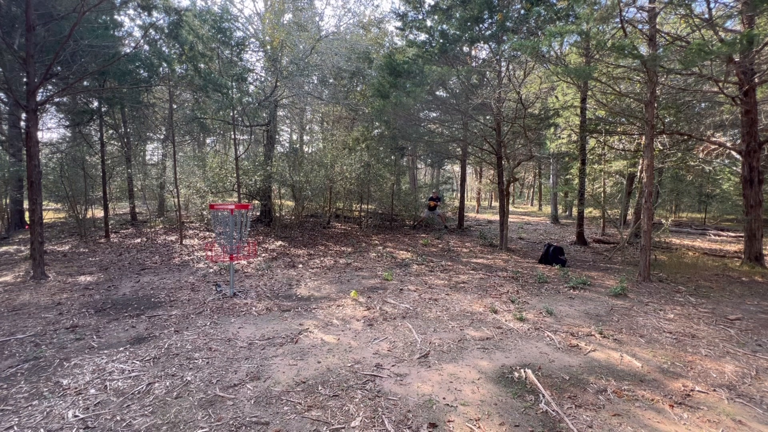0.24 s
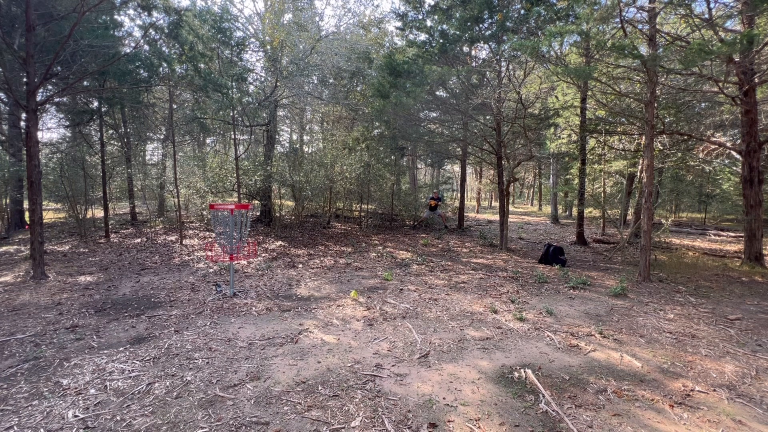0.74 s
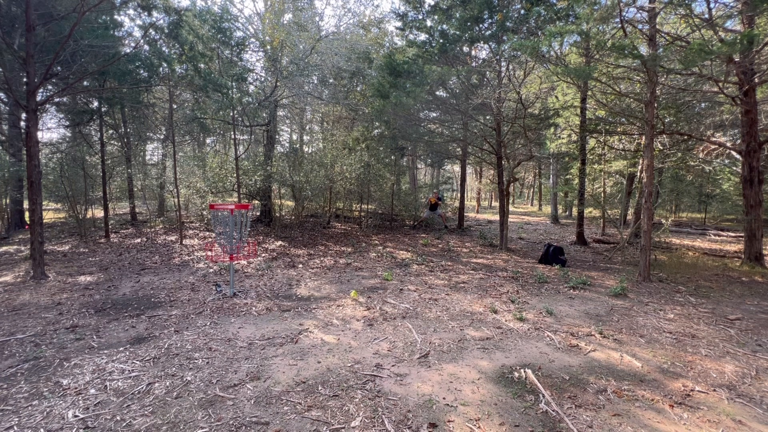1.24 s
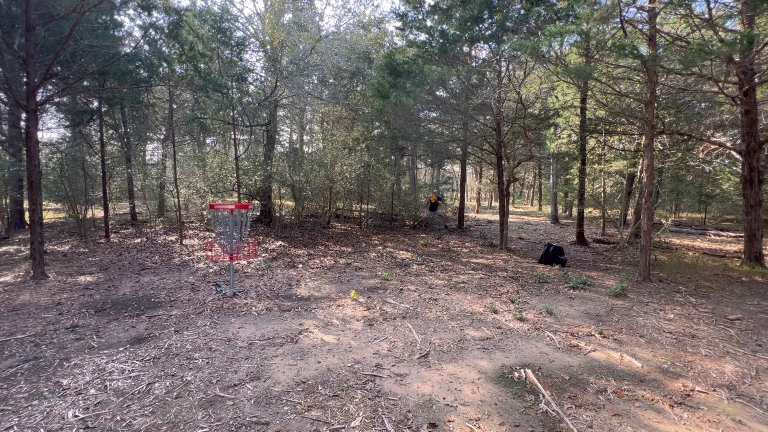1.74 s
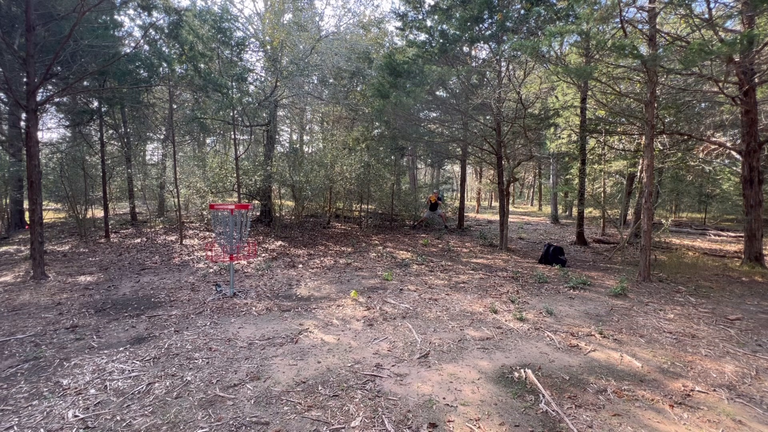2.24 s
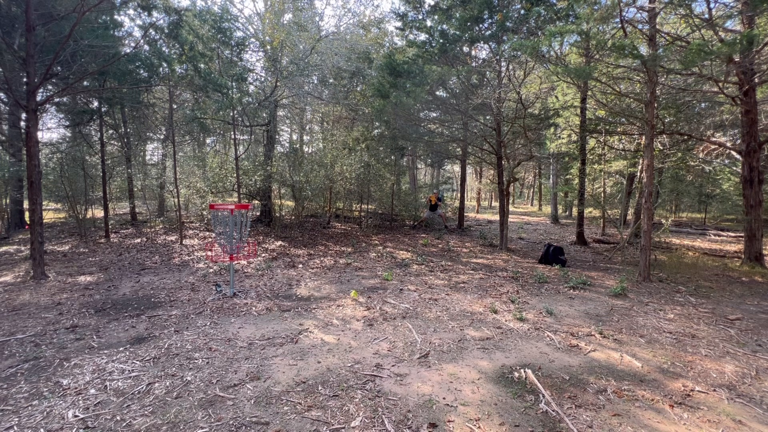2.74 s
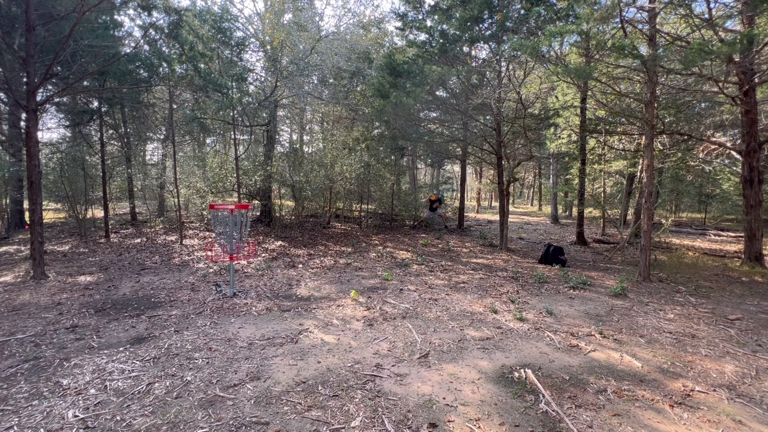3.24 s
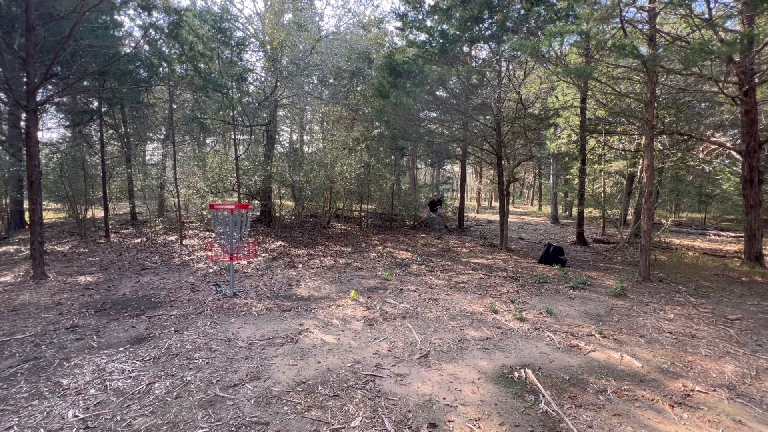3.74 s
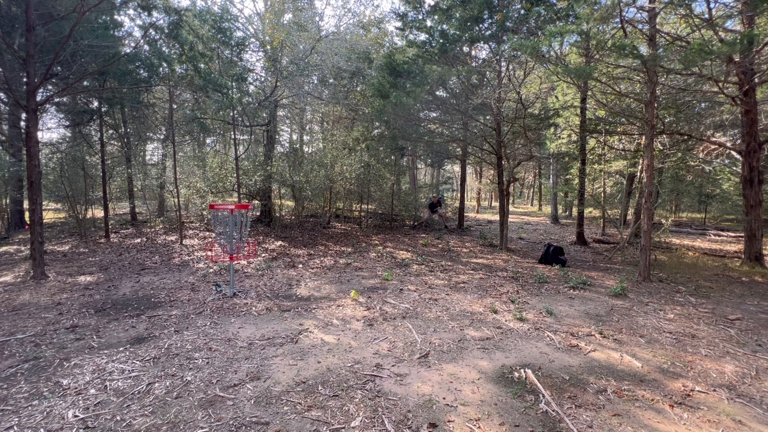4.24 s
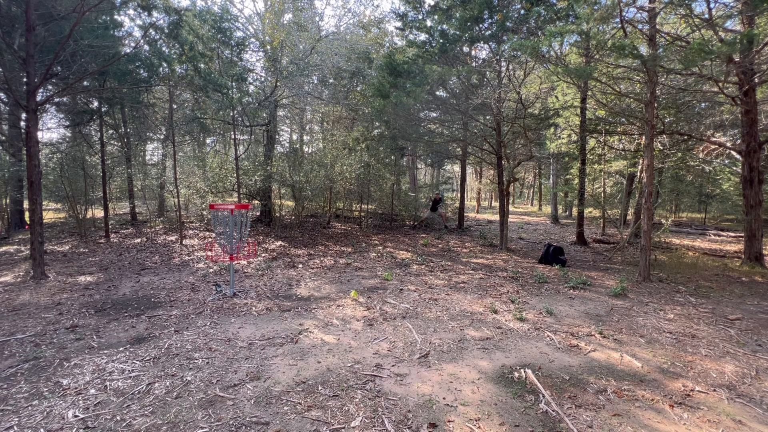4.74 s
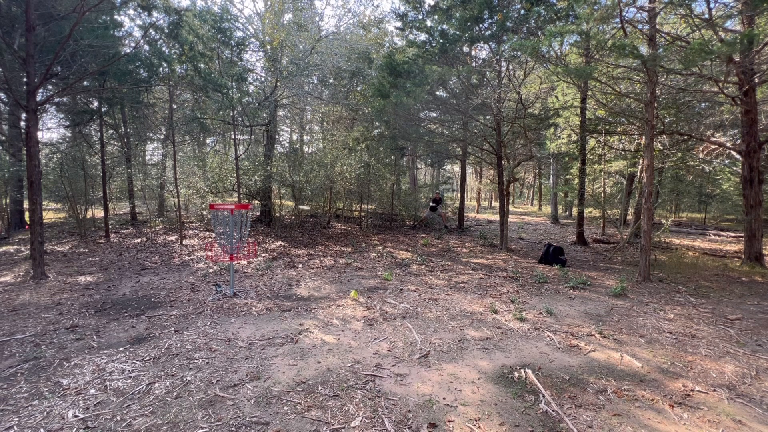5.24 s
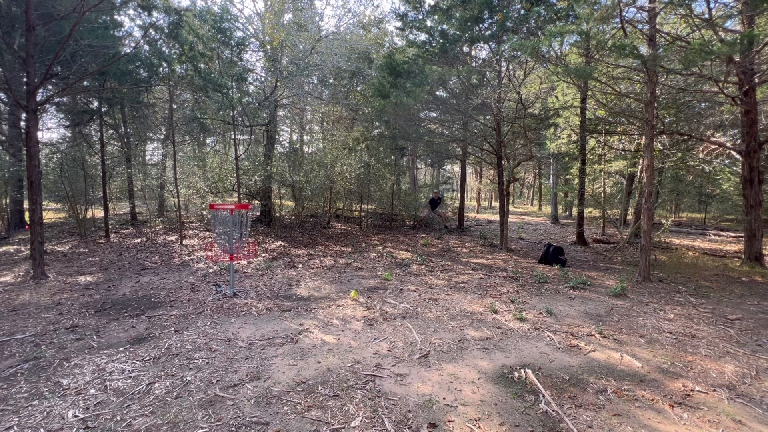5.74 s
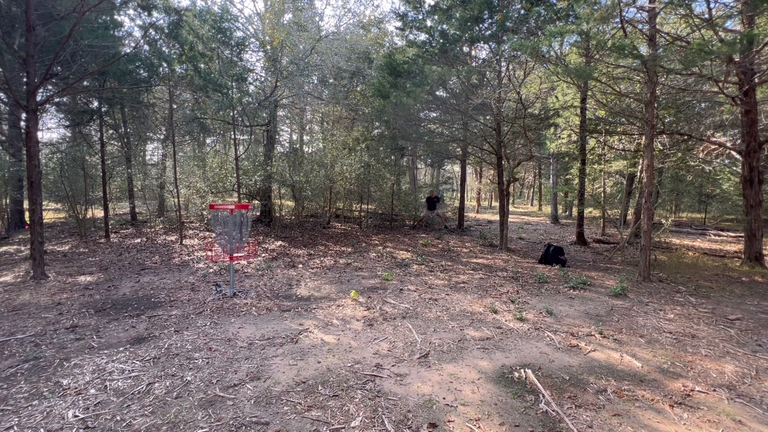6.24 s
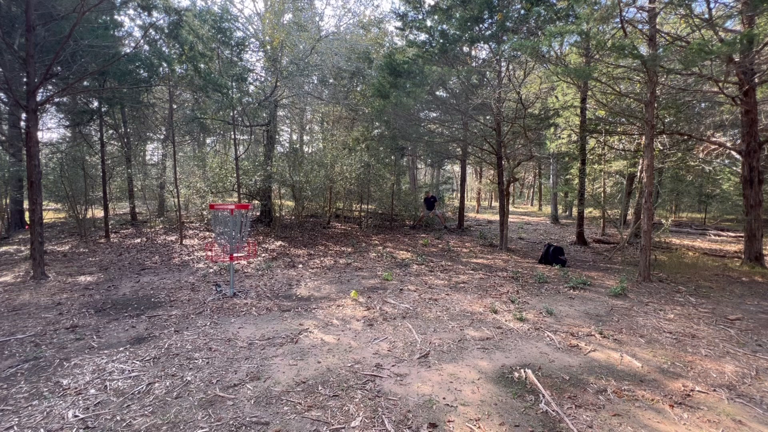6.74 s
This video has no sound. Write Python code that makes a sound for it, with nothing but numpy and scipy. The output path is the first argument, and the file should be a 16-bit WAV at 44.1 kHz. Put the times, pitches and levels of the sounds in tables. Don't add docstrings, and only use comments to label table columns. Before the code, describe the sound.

Faint birdsong and a low traffic wash, broken near the end by a bright, clashing metal chain crash that rattles and clinks out.

```python
import sys
import numpy as np
from scipy import signal
from scipy.fft import rfft, irfft, next_fast_len
from scipy.io import wavfile
from scipy.ndimage import uniform_filter1d, minimum_filter1d, map_coordinates

SR = 44100
rng = np.random.default_rng(int(sys.argv[2]) if len(sys.argv) > 2 else 0)


def master(y):
    cut = np.clip(np.atleast_2d(y).T, -1, 1)
    pcm = np.round(cut * 32767)
    wavfile.write(sys.argv[1], SR, pcm.astype(np.int16))


def amplitude_ratio(level_db):
    exponent = np.asarray(level_db, float) / 20
    return 10 ** exponent


N = 308086


def unit(x):
    return x / np.sqrt(np.mean(x ** 2) + 1e-20)


def along(points, hz):
    f, v = np.transpose(points)
    return np.interp(np.log(hz + 1), np.log(f + 1), v)


def filtered(x, response):
    m = next_fast_len(x.shape[-1] + SR // 2)
    spectrum = rfft(x, m) * response(np.fft.rfftfreq(m, 1 / SR))
    return irfft(spectrum, m)[..., :x.shape[-1]]


def noise(spectrum, channels=1, patchy_db=1):
    z = signal.stft(rng.standard_normal((channels, N)), nperseg=512)[2]
    field = uniform_filter1d(rng.standard_normal(z.shape[1:]), size=6, axis=0)
    field = uniform_filter1d(field, size=12, axis=1)
    flat = signal.istft(z * amplitude_ratio(patchy_db * unit(field)), nperseg=512)[1][:, :N]
    return unit(filtered(flat, lambda hz: amplitude_ratio(along(spectrum, hz))))


def ports(x, lead, lean):
    half = lambda hz: amplitude_ratio(along(lean, hz) / 2) * np.exp(.5j * along(lead, hz))
    return filtered(np.array([x, x]), lambda hz: np.array([half(hz), 1 / half(hz)]))


def puffs(taps, spectrum, t60):
    t = np.arange(SR // 10) / SR
    burst = rng.standard_normal((len(taps), len(t))) * amplitude_ratio(-60 * t / t60)
    puff = filtered(burst, lambda hz: amplitude_ratio(along(spectrum, hz)))
    puff = puff / np.linalg.norm(puff)
    return signal.fftconvolve(taps, puff, axes=1)[:, :taps.shape[1]].sum(axis=0)


# f/Hz, level/dB per Hz
DRONE = [(12, -71), (20, -31.5), (30, -18), (50, -1.5), (70, 2.5), (90, -3), (100, -9.5), (114, -10.5),
         (146, -20), (260, -43), (340, -60), (570, -120)]


def traffic_drone():
    low = noise(DRONE, channels=2, patchy_db=0.0)
    from_right = ports(low[0], [(30, -.15), (200, -.4)], [(60, -1.6)])
    return amplitude_ratio(-50) * (from_right + .1 * low[1] * [[1], [-1]])


# f/Hz, level/dB per Hz
TRAFFIC = [(100, 5), (200, 1), (320, -2), (620, 0.5), (850, -4), (1200, -15), (2000, -22.5), (4000, -33),
           (9000, -36), (11000, -36.5), (13500, -37.5), (14500, -41)]
# f/Hz, likeness [0 to 1]
TRAFFIC_ALIKE = [(100, 0.27), (300, 0.8), (600, 0.67), (1000, 0.18), (9500, 0.064), (11500, 0.63),
                 (13000, 0.76)]
# f/Hz, phase [radians]
TRAFFIC_LEAD = [(50, 0.46), (260, 1.04), (600, 2.12), (900, 4.5), (11000, 3.5), (12700, 1.5)]


def traffic_wash():
    same, *apart = noise([(40, -42)] + TRAFFIC + [(15500, -74)], channels=3, patchy_db=1.2)
    alike = lambda hz: np.clip(along(TRAFFIC_ALIKE, hz), 0, 1)
    shared = ports(same, TRAFFIC_LEAD, [(500, 0.043)])
    wash = filtered(shared, lambda hz: np.sqrt(alike(hz)))
    wash += filtered(np.array(apart), lambda hz: np.sqrt(1 - alike(hz)))
    return amplitude_ratio(-67) * wash


# f/Hz, level/dB per Hz (the sound also thins in narrow bands near 5.3 and 7.7
# kHz)
PORT_HISS = [(900, -4), (1500, 1), (1750, 8.5), (2100, -4.5), (4500, -7.5), (5100, -4.5), (5350, -13),
             (5700, -7), (7100, -1), (7700, -14.5), (8300, -3.5), (9500, -11), (10600, -28)]


def port_hiss():
    hiss = noise([(500, -50)] + PORT_HISS + [(12000, -51)], patchy_db=-1.0)
    return amplitude_ratio(-79.0) * hiss * [[1], [0]]


# t/s, half length/s, leaves level/dB, swish level/dB
STIRS = [
    (.45, .15, -94, -104),
    (.84, .08, -99, -106),
    (2.27, .04, -101, -98),
    (3.797, .02, -101, -90),
    (4.04, .04, -85, -100),
    (4.37, .12, -94, -104),
    (4.636, 0.24, -85, -95),
    (4.91, .1, -91, -102),
    (5.2, 0.053, -86, -89),
    (5.308, 0.074, -90, -79),
]


def leaves():
    t, half, *levels = np.transpose(STIRS)[:, :, None]
    swell_db = -15 * np.abs(np.arange(N) / SR - t) / half
    breeze_db = -104
    rub, swish = [np.sqrt(amplitude_ratio(2 * breeze_db) + np.sum(amplitude_ratio(2 * (db + swell_db)), axis=0)) for db in levels]
    rustle = amplitude_ratio(0.5) * rub * noise([(10800, -42), (11800, -5), (13500, -5), (15200, -37)], patchy_db=2)[0]
    rustle += amplitude_ratio(3.5) * swish * noise([(5000, -20), (7500, -11), (10000, -8), (10800, -23)], patchy_db=5)[0]
    rush = amplitude_ratio(13 + levels[0] + swell_db)[np.argmax(half)]
    rustle += rush * noise([(300, -33), (600, 8.5), (2000, -7), (6000, -34), (9000, -50)])[0]
    return rustle


# t/s, level/dB
TWIGS = [
    (.82, -90),
    (5.269, -74),
]


def twigs():
    ticks = np.zeros(N)
    for t, db in TWIGS:
        ticks[round(t * SR)] = amplitude_ratio(db + 25)
    colour = [(3500, -30), (6000, 12), (13500, 3.0), (15000, -30)]
    return filtered(ticks, lambda hz: amplitude_ratio(along(colour, hz)))


# f/Hz, time to fall 60 dB/s
TRUNKS = [(300, 0.52), (3000, 0.54), (9000, 0.54), (16000, 0.046)]


def trunks(x):
    hz, t, z = signal.stft(rng.standard_normal((2, SR // 2)), SR, nperseg=256)
    fade = amplitude_ratio(-60 * t / along(TRUNKS, hz)[:, None])
    tail = signal.istft(z * fade, SR, nperseg=256)[1]
    tail = tail / np.linalg.norm(tail[0])
    late = np.pad(x, (300, 0))[None]
    return signal.fftconvolve(late, tail, axes=1)[:, :len(x)]


def whistle(rows):
    s, hz, db = np.transpose(rows)
    t = np.arange(s[0], s[-1], 1 / SR)
    edges = np.clip(np.minimum(t - s[0], s[-1] - t) / .003, 0, 1)
    phase = 2 * np.pi * np.cumsum(np.interp(t, s, hz)) / SR
    wave = edges * amplitude_ratio(np.interp(t, s, db)) * np.sin(phase)
    return np.pad(wave, (round(s[0] * SR), N))[:N]


# t/s from the phrase time, f/Hz, level/dB
PHRASE = [
    [(-.157, 2200, -7), (-.14, 2530, -3), (-.117, 2824, -2), (-.07, 2930, -6), (-.02, 2956, -15.5),
     (.015, 2960, -12)],
    [(-.002, 3953, -8), (.012, 3850, 4.5), (.034, 3265, 6.5), (.041, 3150, -47)],
    [(.058, 3150, 5), (.066, 3500, 7), (.074, 4300, 5)],
    [(.07, 2980, -8), (.105, 2790, -16)],
    [(.11, 2456, -8), (.15, 2030, -14)],
    [(.17, 1543, -11), (.2, 1696, -13), (.225, 1814, -11)],
]
# t/s, level/dB, extra level of the first note/dB
PHRASES = [
    (1.779, -77, -40),
    (2.165, -72, 0),
    (2.551, -72, 2),
    (2.936, -71, 1.5),
    (3.34, -72, 0.5),
]
# t/s, length/s, start f/Hz, end f/Hz, level/dB
CHIPS = [(2.014, 0.035, 6200, 8450, -82), (2.523, 0.022, 6300, 5430, -86), (2.124, 0.02, 6400, 5670, -91),
         (2.906, 0.015, 6400, 5340, -79.5), (3.307, 0.017, 6500, 5200, -75),
         (3.37, 0.0097, 10600, 8900, -67), (3.371, 0.0097, 9000, 8340, -58.5),
         (3.89, 0.032, 6400, 8400, -85.5), (3.982, 0.064, 7140, 6860, -87), (3.907, 0.019, 2830, 2740, -88),
         (5.41, 0.035, 5600, 5470, -76)]


def birds():
    song, chips = np.zeros(N), np.zeros(N)
    for t, db, first_db in PHRASES:
        for k, note in enumerate(PHRASE):
            note_db = db + (0 if k else first_db)
            song += whistle(np.array(note) + [t, 0, note_db])
    for t, length, from_hz, to_hz, db in CHIPS:
        chips += whistle([(t, from_hz, db + 1.0), (t + length, to_hz, db + 4.5)])
    flutter = map_coordinates(rng.standard_normal(N // 300 + 4), [np.arange(N) / 300])
    song, chips = amplitude_ratio(2.2 * flutter) * song, amplitude_ratio(3 * flutter) * chips
    direct = (song + chips) * amplitude_ratio([[-1.5], [-4]])
    to_branches = (song + amplitude_ratio(-2.5) * chips)[None]
    branches = np.array([puffs(to_branches, [(20, 0)], t60=0.16) for port in range(2)])
    return direct + trunks(amplitude_ratio(-1.5) * song + amplitude_ratio(-12.0) * chips) + amplitude_ratio(1.0) * branches


def dying(events, fall, start):
    t, db = np.transpose(events)[:, :, None]
    since = np.arange(start, N) / SR - t
    return np.sqrt(np.sum((since >= 0) * amplitude_ratio(2 * (db - fall * np.abs(since))), axis=0))


def contacts(gain, rate, scatter_db, count):
    luck = rng.standard_normal((count, len(gain)))
    hits = rng.random((count, len(gain))) < rate / SR
    taps = hits * amplitude_ratio(scatter_db * luck) * rng.choice([-1, 1], len(gain))
    return unit(taps) * gain


def blows(rows, column, start, count, spread_s):
    taps = np.zeros((count, N - start + SR))
    for row in rows:
        late = (SR * spread_s * rng.random(count) ** 3).astype(int)
        sizes = amplitude_ratio(3.0 * rng.standard_normal(count)) * rng.choice([-1, 1], count)
        db = row[1] + (row[column] if column else 0)
        taps[np.arange(count), round(row[0] * SR) - start + late] += amplitude_ratio(db) * sizes
    return taps[:, :N - start]


def ringing(taps, modes):
    t = np.arange(SR // 3) / SR
    hz, scatter_hz, db, t60 = np.transpose(modes)[:, :, None, None]
    luck = rng.standard_normal((2, len(modes), len(taps), 1))
    fade = amplitude_ratio(db + 2.5 * luck[1] - 60 * t / t60)
    rings = (fade * np.sin(2 * np.pi * (hz + scatter_hz * luck[0]) * t)).sum(axis=0)
    rings = rings / np.linalg.norm(rings)
    return signal.fftconvolve(taps, rings, axes=1)[:, :taps.shape[1]].sum(axis=0)


# t/s, level/dB
POLE = [(5.43, -65), (5.52, -59), (6.5, -58.5), (6.7, -76.5), (6.98, -67)]


def pole(start):
    t = np.arange(start, N) / SR
    hum_db = np.interp(t, *np.transpose(POLE), left=-140)
    return amplitude_ratio(9.5 + hum_db) * np.sin(2 * np.pi * 111 * t)


# t/s, peak level/dB, level of the rattle after it/dB, crack level over the peak/dB
CLANKS = [(5.433, -42, -23.5, -16), (5.4387, -7.5, -19, -13), (5.478, 2, -21, -13.5), (5.494, -4, -23, -3),
          (5.509, -8.5, -28.5, -16), (5.522, -13, -38, -14), (5.559, -30, -40, -16),
          (5.5728, -17.5, -31, 5.5), (5.5926, -24, -45, -16), (5.614, -22, -53, -18), (5.62, -25, -54, -10),
          (5.7147, -18.5, -52, -19), (5.7448, -22, -55, -25), (5.76, -23, -40, -22),
          (5.8047, -17, -36, -8.5), (5.847, -11, -42, -19), (5.9233, -18, -32, -26),
          (5.9575, -13, -36.5, -9), (6.0517, -25.5, -57, -18), (6.064, -25, -50, -20),
          (6.1115, -32.5, -64, -26), (6.2016, -41, -58, -10), (6.212, -22, -42, -16),
          (6.226, -29, -47, -10), (6.243, -18, -50.5, -13), (6.262, -19, -58, -18), (6.291, -38, -65, -3),
          (6.3693, -25, -42, -25), (6.4097, -28, -49, -23), (6.546, -23, -42, -15), (6.568, -31, -49, -6),
          (6.72, -21.5, -46, -9.5), (6.802, -32.5, -72, -19), (6.8396, -35, -76, -27),
          (6.8571, -38, -74, -24), (6.9045, -48, -73, -22), (6.955, -44, -55.5, -9)]
# f/Hz, scatter of f/Hz, level/dB, time to fall 60 dB/s
LINK = [(4283, 26, -1, .14), (4370, 55, -3, .07), (4505, 30, -5, .09), (5060, 70, -10, .09),
        (6600, 450, -13, .07), (9900, 200, -15, .1)]
# f/Hz, scatter of f/Hz, level/dB, time to fall 60 dB/s
LINK_HIGH = [(11890, 50, -3, .09), (12110, 50, 0, .09), (12300, 70, -1, .09)]
# f/Hz, level/dB
CRACK = [(150, -50), (1200, -9.5), (2500, -2), (3600, -2), (5500, 0), (7200, -2.5), (7800, -11),
         (9500, 1.5), (11000, 4), (13200, -18), (14300, 1), (15800, -1.5)]


def clashing_links(start):
    first = CLANKS[0][0]
    sway = dying([(first, -45)], 13.6, start)
    rattle = dying([(t, db) for t, _, db, _ in CLANKS], 227, start)
    jingle = contacts(np.hypot(rattle, sway), rate=22, scatter_db=3.5, count=16)
    clanks = [blows(CLANKS, column=k, start=start, count=16, spread_s=.004) for k in (0, 0, 3)]
    bend = ringing(amplitude_ratio(-13.5) * jingle + amplitude_ratio(7) * clanks[0], LINK)
    hard = dying([(first, 3)], 8.4, start)
    overtone = ringing(hard * (amplitude_ratio(-13.5) * jingle + amplitude_ratio(4) * clanks[1]), LINK_HIGH)
    crack = puffs(amplitude_ratio(-1) * jingle + amplitude_ratio(13) * clanks[2], CRACK, t60=0.022)
    return bend + overtone + crack


# t/s, peak level/dB, disc body over the peak/dB, rim over the peak/dB
THUDS = [(5.436, -19.5, -33, -2.5), (5.452, -35, -20, 7), (5.478, -26.5, -28, -1), (5.498, -44, -20, -7),
         (5.575, -42.5, -25, 21), (5.619, -26.5, -6, -6), (5.638, -49.5, 12, -2), (5.657, -53, -12.5, 15),
         (5.715, -48.5, -15, -3), (5.794, -32.5, -24, -3.5), (5.828, -38, -2, -1.5), (5.853, -45, -2, -9),
         (5.865, -33.5, -17, -9), (5.887, -40.5, -11, -6), (5.907, -35.5, -24, -4), (5.969, -36, -1, 4),
         (6.046, -42.5, 4.5, -2), (6.084, -38.5, -7, -16), (6.183, -42, -2, -4), (6.249, -43, -1.5, -5),
         (6.52, -52, -15, 4), (6.543, -49, -18, 0), (6.716, -50, -19, -3)]
# f/Hz, scatter of f/Hz, level/dB, time to fall 60 dB/s
FRAME = [(490, 30, -7, 0.04), (885, 45, 1.5, 0.04), (1058, 30, -6, 0.09)]
# f/Hz, scatter of f/Hz, level/dB, time to fall 60 dB/s
RIM = [(1480, 50, -14, .08), (1790, 36, 0, .1), (2030, 60, -6, .05), (2250, 60, -8, .05)]
# f/Hz, level/dB
KNOCK = [(100, -75), (300, -8.5), (600, -5), (1400, 5), (2200, 0.5), (3500, 0), (8000, -83)]


def cage(start):
    shake = dying([(t, db - 12) for t, db, *_ in THUDS], 410, start)
    quiver = dying([(CLANKS[0][0], -48.5)], 12.3, start)
    shiver = contacts(np.hypot(shake, quiver), rate=50, scatter_db=4.0, count=8)
    knocks, rim = [shiver + amplitude_ratio(18) * blows(THUDS, column=k, start=start, count=8, spread_s=0.004)
                   for k in (0, 3)]
    rattle = puffs(knocks + rim, KNOCK, t60=0.036)
    return amplitude_ratio(-2.0) * ringing(knocks, FRAME) + amplitude_ratio(-3.0) * ringing(rim, RIM) + amplitude_ratio(-6.0) * rattle


# f/Hz, level/dB
PLASTIC = [(70, -28), (140, -12), (300, -2), (520, -14), (900, -23), (3000, -58)]


def disc(start):
    pushes = blows(THUDS, column=2, start=start, count=3, spread_s=0.0258)
    return amplitude_ratio(11.5) * puffs(pushes, PLASTIC, t60=0.22)


# t/s, level/dB
TUGS = [(5.436, -28.5), (5.49, -33), (5.55, -49), (5.62, -41), (5.765, -41.5), (5.86, -43), (5.955, -43),
        (6.06, -56), (6.15, -46), (6.225, -46), (6.27, -56), (6.37, -63), (6.54, -50), (6.7, -58),
        (6.84, -67), (6.965, -60)]
# f/Hz, scatter of f/Hz, level/dB, time to fall 60 dB/s
RINGS = [(14900, 60, -2, .25), (15100, 70, 0, .25), (15400, 110, -1, .25), (15680, 60, -1, .25)]


def taut_chains(start):
    pull = dying(TUGS, 83, start)
    return ringing(amplitude_ratio(5) * contacts(pull, rate=21, scatter_db=0.5, count=16), RINGS)


# f/Hz, phase [radians]
BASKET_LEAD = [(50, 0), (800, 1.7), (2000, 2), (2450, 3), (3300, 3.35), (3700, 4.3), (4300, 5.5),
               (6800, 6.6), (7500, 9.3), (8200, 9.5), (9400, 10.9), (10400, 9.42), (11500, 9.3),
               (12700, 6.28), (14600, 6.28), (15800, 3.9)]
# f/Hz, level/dB
BASKET_LEAN = [(110, -2), (380, -.5), (850, 4), (1800, 2.5), (2400, 0), (3200, 0), (4400, 5), (7000, 4),
               (7600, 1), (10000, 0), (10500, 1.5), (15000, 1.5)]
# f/Hz, level/dB
SCATTER = [(300, -16), (2000, -8.5), (2400, -8), (3300, -6.5), (3800, -1.5), (6500, 2.5), (7400, 6),
           (7750, -0.5), (8200, 4.5), (9000, 2), (9900, 4), (10400, -7), (11400, -13.5), (11800, 1.5),
           (12800, -16), (14500, -13)]


def scatter(x, count):
    turn = (np.arange(len(x)) / (.04 * SR) - np.arange(count)[:, None]) % count
    slices = x * np.clip(1 - np.abs(turn - 1), 0, 1)
    pair = np.sqrt(count) * np.array([puffs(slices, [(20, 0)], t60=0.035) for port in range(2)])
    return filtered(pair, lambda hz: amplitude_ratio(along(SCATTER, hz) + along(BASKET_LEAN, hz) * [[.5], [-.5]]))


def basket():
    start = round(THUDS[0][0] * SR) - 400
    steel = pole(start) + clashing_links(start) + cage(start) + disc(start) + taut_chains(start)
    heard = steel + amplitude_ratio(-9.0) * trunks(steel)[0]
    near = ports(heard, BASKET_LEAD, BASKET_LEAN) + scatter(heard, count=7)
    return np.pad(near, ((0, 0), (start, 0)))


# t/s, level/dB, time to fall 60 dB/s
TRAY = (6.4295, -33.5, 0.039)
# f/Hz, level/dB
TRAY_COLOUR = [(120, -38), (350, 14.5), (900, -5.5), (3000, -13.5), (14500, -7.5), (16000, -34)]


def tray():
    t, db, t60 = TRAY
    tap = np.zeros((1, N))
    tap[0, round(t * SR)] = amplitude_ratio(db + 16.0)
    return puffs(tap, TRAY_COLOUR, t60)


def scene():
    background = traffic_drone() + traffic_wash() + port_hiss()
    return background + leaves() + twigs() + birds() + basket() + tray()


def joint_stereo(x, other_db, neighbour_db, jump_db):
    early = 1024 - 377
    both = np.array([x[0] + x[1], x[0] - x[1]])
    z = signal.stft(np.pad(both, ((0, 0), (early, 0))) / 2, nperseg=2048)[2]
    power = (np.abs(z[:, :-1]) ** 2).reshape(2, 64, 16, -1).sum(axis=2)
    loud = -minimum_filter1d(-power.max(axis=0), size=11, axis=0)
    loud[:22] = 0
    keep = (power > amplitude_ratio(-2 * other_db) * power[::-1]) & (power > amplitude_ratio(-2 * neighbour_db) * loud)
    keep[:, :6] = True
    treble = power[:, 7:34].sum(axis=(0, 1))
    keep[..., 1:] |= treble[1:] > amplitude_ratio(2 * jump_db) * treble[:-1]
    z[:, :-1] *= np.repeat(keep, 16, axis=1)
    mid, side = signal.istft(z, nperseg=2048)[1][:, early:early + N]
    return np.array([mid + side, mid - side])


def band_limit(x):
    return signal.sosfilt(signal.butter(12, 16830, fs=SR, output="sos"), x)


def record(dry):
    rounded = dry / (1 + np.abs(dry / .95) ** 4) ** .25
    limited = filtered(rounded, lambda hz: np.clip((16050 - hz) / 450, 0, 1) ** 2)
    joined = joint_stereo(limited, other_db=9.5, neighbour_db=22, jump_db=7)
    end_s = 6.986
    return band_limit(joined * (np.arange(N) < end_s * SR))


dry = scene()
out = record(dry)
master(out)
```